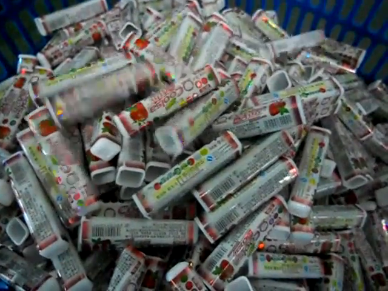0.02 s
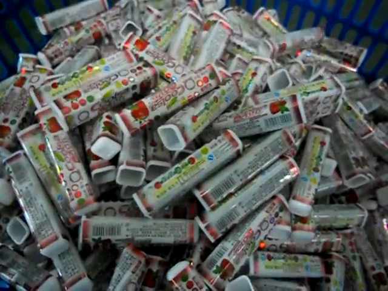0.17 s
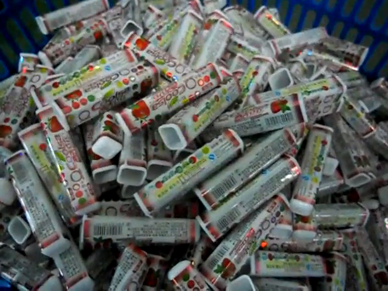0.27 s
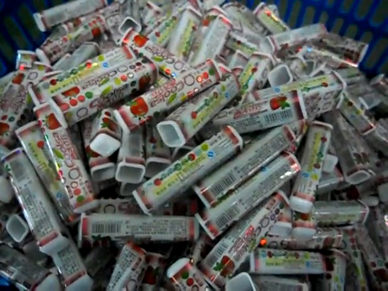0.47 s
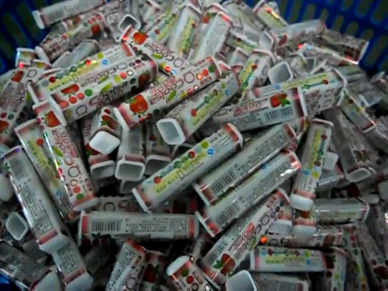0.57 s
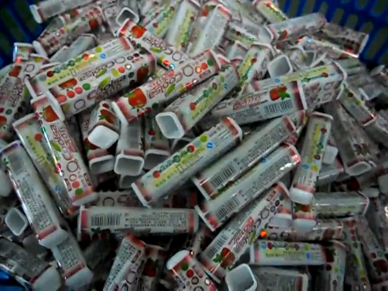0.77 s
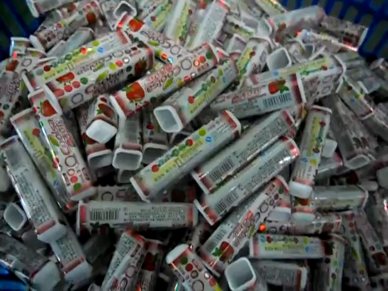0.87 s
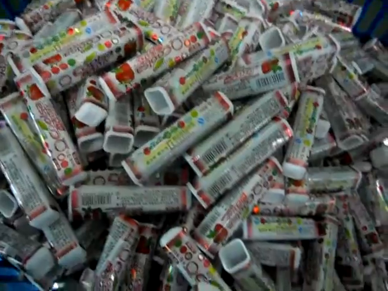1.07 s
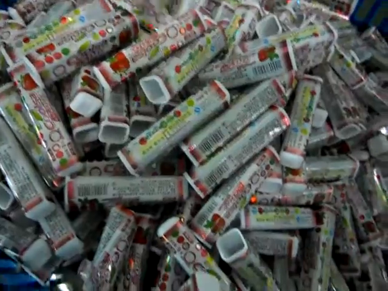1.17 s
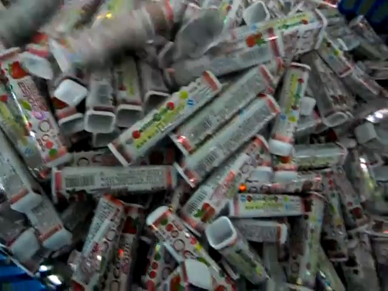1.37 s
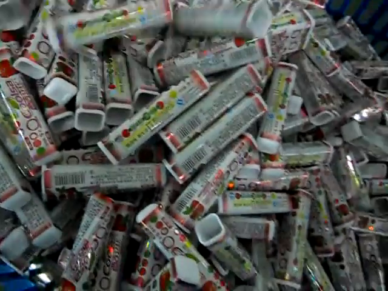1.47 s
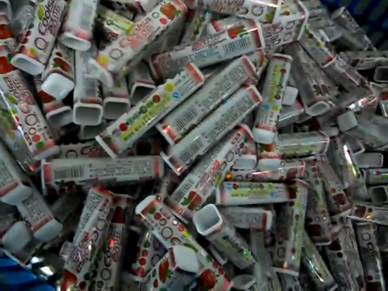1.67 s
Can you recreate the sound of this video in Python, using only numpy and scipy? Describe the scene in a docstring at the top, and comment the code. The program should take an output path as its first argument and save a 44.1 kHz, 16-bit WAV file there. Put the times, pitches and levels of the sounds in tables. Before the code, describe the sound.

Labeling machine rushing with thuds and small squeaks, followed by a light plastic bottle dropping and bouncing

```python
"""A motor's hum and rumble are heard first, with the running noise of a labeling machine.
The hum is a harmonic series; the machine noise is shaped noise, louder from about 0.3 to 1.1 s.
Decaying noise and tones make its knocks; short wavering sines make its squeaks.
A labeled plastic bottle then drops onto a pile and bounces: each hit is a noise click,
a set of damped wall modes and a hollow tone. A diffuse tail follows knocks, squeaks and hits."""
import sys
import numpy as np
from scipy import signal
from scipy.fft import rfft, irfft
from scipy.io import wavfile
from scipy.ndimage import uniform_filter1d, minimum_filter1d

SR = 44100
rng = np.random.default_rng(int(sys.argv[2]) if len(sys.argv) > 2 else 0)


def inscribe(sig):
    """Save sig as 16-bit PCM at rate SR to the path in sys.argv[1].

    A 1-D sig is mono; a 2-D sig holds one channel per row.
    Samples are clipped to [-1, 1] before scaling.
    """
    pcm = np.round(np.clip(np.atleast_2d(sig).T, -1, 1) * 32767)
    wavfile.write(sys.argv[1], SR, pcm.astype(np.int16))


N = 77175
EDGE_HZ = 8080  # upper band limit


def amp(db):
    """Level law: decibels to an amplitude ratio."""
    return 10 ** (np.asarray(db) / 20)


def unit(x):
    """Power normalization: scales a signal to rms 1."""
    return x / np.sqrt(np.mean(x ** 2) + 1e-20)


def curve(points):
    """Linear interpolation of a control curve at every sample."""
    return np.interp(np.arange(N) / SR, *np.transpose(points))


def colour(x, spectrum):
    """Spectral shaping: weights each frequency, with rms 1 at the output."""
    f, db = np.transpose(spectrum)
    hz = np.fft.rfftfreq(len(x), 1 / SR)
    weight = amp(np.interp(np.log(hz + 1), np.log(f), db))
    return unit(irfft(rfft(x) * weight * (hz < EDGE_HZ), len(x)))


def noise(spectrum):
    """Random excitation: coloured noise as long as the scene."""
    return colour(rng.standard_normal(N), spectrum)


def drift(rate_hz):
    """Random modulation: noise under a Gaussian lowpass, without its mean, rms 1."""
    hz = np.fft.rfftfreq(N, 1 / SR)
    lowpass = np.exp(-(hz / rate_hz) ** 2) * (hz > 0)
    return unit(irfft(rfft(rng.standard_normal(N)) * lowpass, N))


def ring(t, rise, t60):
    """Damped response: a linear rise times an exponential decay of 60 dB in t60."""
    return np.minimum(t / rise, 1) * np.exp(-np.log(1000) * t / t60)


def add(mix, s, sound):
    """Superposition: adds a sound to the mix at time s."""
    part = mix[max(round(s * SR), 0):][:len(sound)]
    part += sound[:len(part)]


# running-noise level before flutter: t/s, level/dB
RUNNING_LEVEL = [(0, -44), (.07, -40), (.12, -35), (.21, -34.5), (.3, -27.5), (.35, -24.5), (.46, -28),
                 (.56, -23.5), (.66, -22), (.77, -23), (.87, -21), (.97, -20.5), (1.04, -19.5),
                 (1.09, -24.5), (1.13, -31), (1.24, -36.5), (1.36, -34.5), (1.44, -41.5), (1.51, -35.5),
                 (1.58, -39.5), (1.75, -40.5)]
# hiss level before flicker: t/s, level/dB
HISS_LEVEL = [(0, -57), (.12, -44.5), (.25, -41), (.31, -35), (.345, -28), (.41, -25.5), (.46, -33.5),
              (.54, -32.5), (.57, -28), (.61, -36), (.7, -34), (.73, -30.5), (.8, -34), (.86, -30.5),
              (.92, -29.5), (.97, -27), (1.035, -28.5), (1.06, -22.5), (1.1, -30.5), (1.13, -35.5),
              (1.25, -45), (1.37, -39.5), (1.41, -66), (1.53, -42), (1.59, -54), (1.75, -47.5)]
# relative spectrum of the running noise: f/Hz, level/dB
BODY_SPECTRUM = [(20, -28), (60, -8.5), (130, -2), (190, -9), (270, -5.5), (500, -6), (900, -4.5),
                 (1300, -4), (1600, -9.5), (2100, -16.5), (4000, -19), (8000, -42)]
# relative spectrum of hiss and rattle: f/Hz, level/dB
HISS_SPECTRUM = [(600, -35), (1500, -14), (2200, -5), (3200, -3), (4400, 1), (5400, -1.5), (6400, 0),
                 (8000, -3.5)]
GRAIN_PER_S, GRAIN_SPREAD_DB, GRAIN_DB = 700, 1.5, -8  # grain level relative to the smooth hiss


def running_noise(flutter_db=1.47, flicker_db=2.34):
    """Amplitude-modulated noise: a rushing body and a hiss with random impulses in it."""
    flutter, flicker = drift(rate_hz=60), drift(rate_hz=90)
    body = noise(BODY_SPECTRUM) * amp(curve(RUNNING_LEVEL) + flutter_db * flutter)
    struck = rng.random(N) < GRAIN_PER_S / SR
    sign = rng.choice([-1, 1], N)
    strength = amp(GRAIN_SPREAD_DB * np.minimum(rng.exponential(1, N), 4))
    grains = colour(struck * sign * strength, HISS_SPECTRUM)
    hiss = unit(noise(HISS_SPECTRUM) + amp(GRAIN_DB) * grains)
    return body + hiss * amp(curve(HISS_LEVEL) + flicker_db * flicker)


# knocks of the mechanism, before their envelopes:
# t/s, thud level/dB, rattle level/dB, rattle t60/s
KNOCK_EVENTS = [(0.333, -12.5, -18.5, .07), (.383, -14, -18.5, 0.063), (.390, -32, -19, .04),
                (.652, -18.5, -25, 0.062), (0.961, -38, -26.5, 0.071), (1.045, -10, -44, 0.038),
                (1.05, -8, -16, .04)]
# relative spectrum of a thud: f/Hz, level/dB
THUD_SPECTRUM = [(30, -20.5), (120, -20.5), (350, 13), (600, -10), (1000, 10.5), (1400, 2.5), (2000, -17),
                 (5000, -28.5)]
# dull bumps of the frame: t/s, level/dB
BUMP_EVENTS = [(.105, -30), (0.71, -18), (.904, -14)]
THUD_T60, KNOCK_RISE_S = 0.037, 0.003  # s
RATTLE_RING_DB, RATTLE_RING_HZ = -3, 4480  # tone level relative to the rattle level
BUMP_HZ, BUMP_RISE_S, BUMP_T60 = 187.8, .004, 0.19  # times in s


def knocks():
    """Damped impact response: noise thuds with bright ringing rattles, and decaying frame tones."""
    out, t = np.zeros(N), np.arange(SR // 4) / SR
    for s, thud_db, rattle_db, rattle_t60 in KNOCK_EVENTS:
        wander = drift(rate_hz=150)[:len(t)]
        tone = amp(RATTLE_RING_DB) * wander * np.sin(2 * np.pi * RATTLE_RING_HZ * t)
        thud = colour(rng.standard_normal(len(t)), THUD_SPECTRUM)
        add(out, s, amp(thud_db) * thud * ring(t, KNOCK_RISE_S, THUD_T60))
        add(out, s, amp(rattle_db) * (rattle(len(t)) + tone) * ring(t, KNOCK_RISE_S, rattle_t60))
    for s, db in BUMP_EVENTS:
        add(out, s, amp(db) * np.sin(2 * np.pi * BUMP_HZ * t) * ring(t, BUMP_RISE_S, BUMP_T60))
    return out


def rattle(count, grains_per_s=1500, spread_db=3):
    """Random impulse train: small bright contacts, mixed with noise of the same spectrum."""
    struck = rng.random(count) < grains_per_s / SR
    sign = rng.choice([-1, 1], count)
    strength = amp(spread_db * np.minimum(rng.exponential(1, count), 3))
    taps = colour(struck * sign * strength, HISS_SPECTRUM)
    return unit(taps + 1.8 * colour(rng.standard_normal(count), HISS_SPECTRUM))


# bottle hits, before envelopes: t/s, click level/dB, wall level/dB, wall frequency factor/1,
# hollow f/Hz, hollow level/dB, hollow t60/s
BOTTLE_HITS = [(1.0490, -15, -20, 0.99, 925, -4.5, 0.013), (1.099, -11, -14, 1.03, 949, -16.5, 0.084),
               (1.1030, -25, -23, 0.68, 647, -5.5, 0.02), (1.1722, -21, -15.5, 1.0, 1051, -14, 0.056),
               (1.1931, -35.5, -32.5, 1.0, 1035, -29.5, 0.15), (1.2115, -14, -11.5, 1.08, 646, -15, 0.048),
               (1.2150, -17, -24, 0.83, 2340, -21, 0.035), (1.2206, -24.5, -25, 1.2, 1059, -29, 0.24),
               (1.2519, -44, -34.5, 1.0, 1042, -28.5, 0.12), (1.2827, -31, -33.5, 1.07, 970, -40.5, 0.063),
               (1.3222, -28, -34.5, .8, 1060, -21, 0.033), (1.333, -48, -33.5, .78, 2390, -20.5, 0.016),
               (1.351, -24, -35, 1.04, 1870, -21, 0.032), (1.3560, -33.5, -48, 0.41, 730, -22, 0.039),
               (1.3770, -35, -35, 1.0, 816, -46, 0.038), (1.4227, -34, -34.5, 1.02, 1100, -49, .04),
               (1.468, -24.5, -19, .99, 1870, -17.5, 0.021), (1.4865, -34, -36, .98, 1065, -23.5, 0.033)]
# modes of a bottle's wall, before each hit's factor and level: f/Hz, level/dB, t60/s
WALL_MODES = [(1990, -10, 0.017), (3320, -3, 0.021), (3740, -12.5, .025), (4505, 4, .016), (4850, 2, 0.018),
              (5950, -7.5, .022), (6690, -3, 0.015), (7260, -6, 0.036)]
# relative spectrum of a contact click: f/Hz, level/dB
CLICK_SPECTRUM = [(100, -11.5), (350, -12), (750, 0), (1500, 2.5), (2700, 0.5), (4600, -1), (5700, -4.5),
                  (7300, -2), (8000, -3)]
CLICK_T60, HOLLOW_RISE_S, HIT_RISE_S = 0.037, .0015, 0.00014  # s
PILE_ECHO_S, PILE_ECHO_DB = .0024, -12.5


def bottles():
    """Modal superposition: each hit clicks, rings the wall and the hollow; the pile echoes it."""
    out, t = np.zeros(N), np.arange(SR // 6) / SR
    for s, click_db, wall_db, factor, hollow_hz, hollow_db, hollow_t60 in BOTTLE_HITS:
        crack = colour(rng.standard_normal(len(t)), CLICK_SPECTRUM)
        click = amp(click_db) * crack * ring(t, HIT_RISE_S, CLICK_T60)
        wall = np.zeros(len(t))
        for hz, db, t60 in WALL_MODES:
            mode = np.sin(2 * np.pi * (hz * factor * t + rng.random()))
            wall += amp(wall_db + db) * mode * ring(t, HIT_RISE_S, t60)
        hollow = amp(hollow_db) * np.sin(2 * np.pi * hollow_hz * t)
        hollow *= ring(t, HOLLOW_RISE_S, hollow_t60)
        add(out, s, click + wall + hollow)
        add(out, s + PILE_ECHO_S, amp(PILE_ECHO_DB) * (click + wall))
    return out


# squeaks: start t/s, length/s, mean f/Hz, peak level/dB
SQUEAK_EVENTS = [(0.178, 0.3, 874.7, -33.5), (.615, 0.098, 1325, -20.5), (.635, .045, 1540, -29),
                 (.97, 0.058, 1144, -26), (.985, .06, 1272, -21)]
SQUEAK_WAVER = .007  # rms deviation as a fraction of the frequency


def squeaks():
    """Frequency modulation: short sine tones of rubbing parts, with a random pitch waver."""
    out = np.zeros(N)
    for s, length, hz, db in SQUEAK_EVENTS:
        count = int(length * SR)
        pitch = hz * (1 + SQUEAK_WAVER * drift(rate_hz=280)[:count])
        turns = np.cumsum(pitch) / SR
        add(out, s, amp(db) * signal.windows.tukey(count, .5) * np.sin(2 * np.pi * turns))
    return out


# motor hum partials: multiple of the motor frequency/1, relative level/dB
HUM_PARTIALS = [(1, -1.5), (2, -3), (3, -13.5), (4, -10.5), (5, -15.5)]
# level of the deepest partial before its relative level: t/s, level/dB
THROB_LEVEL = [(0, -41.5), (.09, -37), (.16, -40), (.25, -41), (.33, -27), (.5, -30.5), (.72, -26.5),
               (.79, -40.5), (.9, -26), (1.02, -20), (1.1, -43.5), (1.25, -41.5), (1.43, -49), (1.52, -40),
               (1.75, -35)]
# relative spectrum of the motor rumble: f/Hz, level/dB
RUMBLE_SPECTRUM = [(20, -2.5), (60, 0.5), (130, -0.5), (200, 3), (350, -8), (900, -35.5), (3000, -22)]
MOTOR_HZ, HUM_WAVER_DB, HUM_WAVER_RAD = 48.92, 2.5, 0.57  # wavers are rms values
RUMBLE_DB, OVERTONE_DB = -50, -31
OVERTONE_SHARE, THROB_SHARE = 0.59, 0.3  # overtone dB per dB of running noise and of throb


def motor():
    """Harmonic series: overtones that rise and fall with the running noise and the throb, and rumble."""
    t, throb = np.arange(N) / SR, curve(THROB_LEVEL)
    overtones = OVERTONE_DB + OVERTONE_SHARE * (curve(RUNNING_LEVEL) + 26)
    overtones += THROB_SHARE * (throb + 30)
    out = amp(RUMBLE_DB) * noise(RUMBLE_SPECTRUM)
    for k, (multiple, db) in enumerate(HUM_PARTIALS):
        level = overtones + HUM_WAVER_DB * drift(rate_hz=4.4) if k else throb
        phase = 2 * np.pi * (multiple * MOTOR_HZ * t + rng.random())
        phase += HUM_WAVER_RAD * drift(rate_hz=18)
        out += np.sqrt(2) * amp(level + db) * np.sin(phase)  # sqrt(2): levels are rms
    return out


ROOM_T60, ROOM_DB = 0.27, -29  # decay in s; level of the unit-energy tail


def workshop(x):
    """Diffuse reverberation: convolution with decaying noise, added to the direct sound."""
    t = np.arange(SR // 2) / SR
    tail = rng.standard_normal(len(t)) * ring(t, 0.0028, ROOM_T60)
    return x + amp(ROOM_DB) * signal.fftconvolve(x, tail / np.linalg.norm(tail))[:N]


def scene():
    """Superposition: machine noise and motor stay dry; knocks, hits and squeaks excite the workshop."""
    return (running_noise() + workshop(knocks() + bottles() + squeaks()) + motor())[None]


CEILING = .93  # peak amplitude ahead of the band limit


def record(dry):
    """Peak limiting by a fast smoothed gain, followed by a linear-phase lowpass."""
    allowed = np.minimum(1, CEILING / (abs(dry) + 1e-9))
    gain = uniform_filter1d(minimum_filter1d(allowed, size=61), size=41)
    lowpass = signal.firwin(501, EDGE_HZ, window=("kaiser", 8), fs=SR)
    return signal.oaconvolve(dry * gain, lowpass[None], "same")


dry = scene()
out = record(dry)
inscribe(out)
```